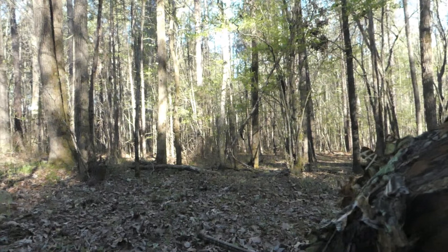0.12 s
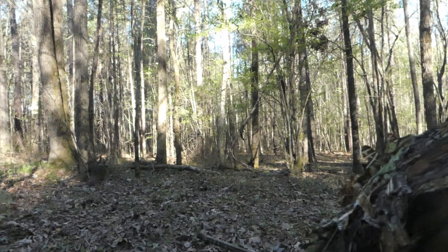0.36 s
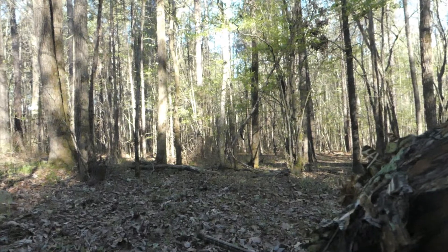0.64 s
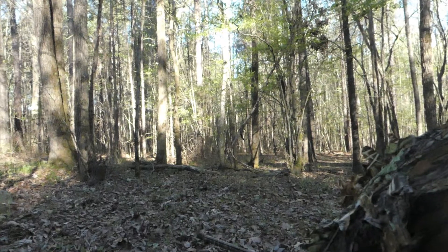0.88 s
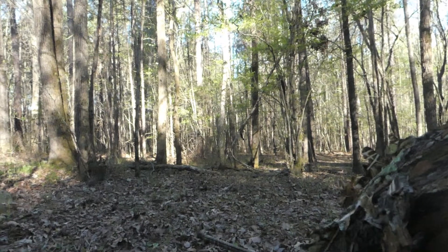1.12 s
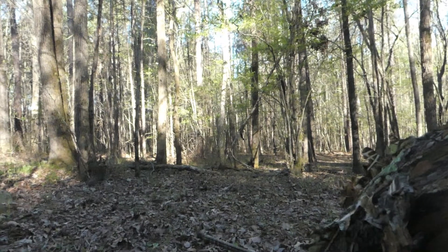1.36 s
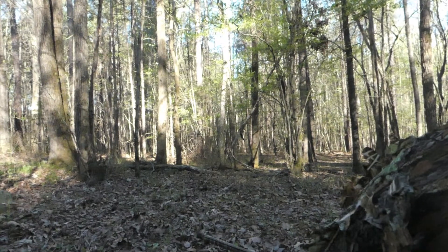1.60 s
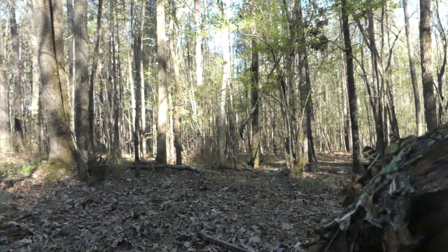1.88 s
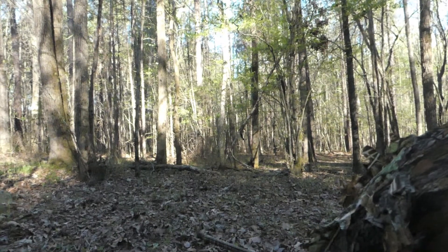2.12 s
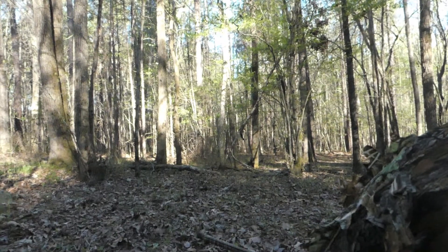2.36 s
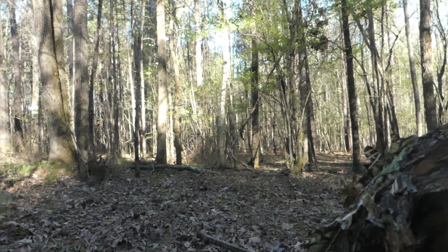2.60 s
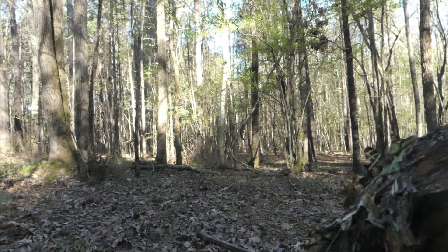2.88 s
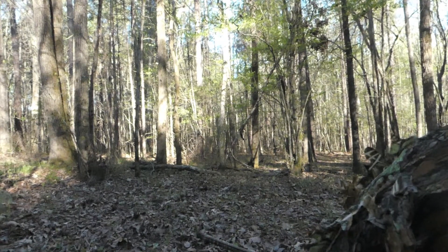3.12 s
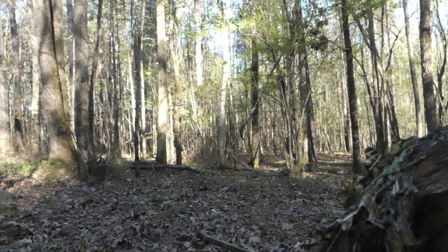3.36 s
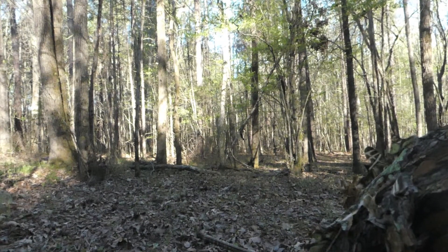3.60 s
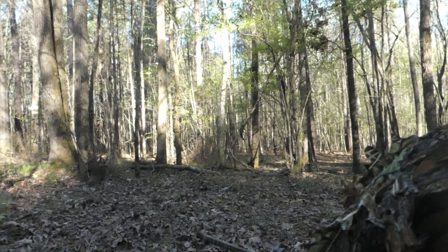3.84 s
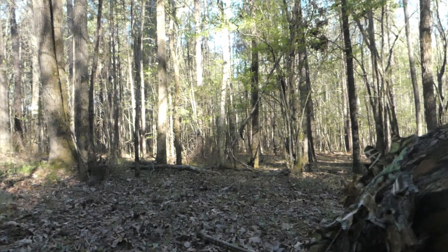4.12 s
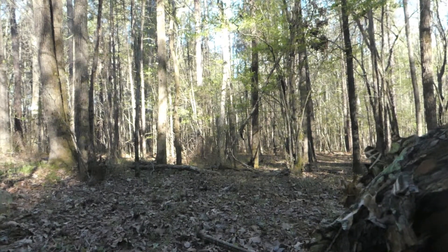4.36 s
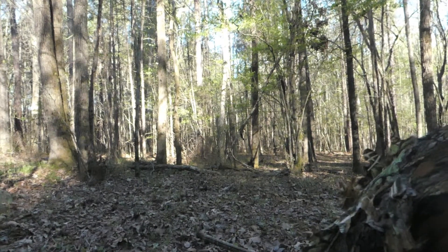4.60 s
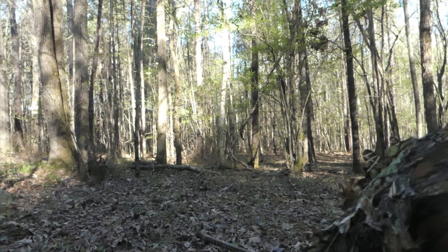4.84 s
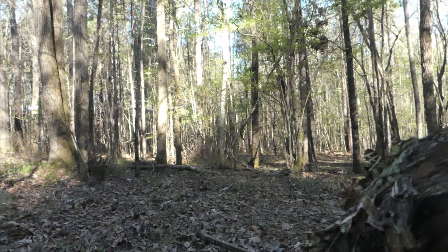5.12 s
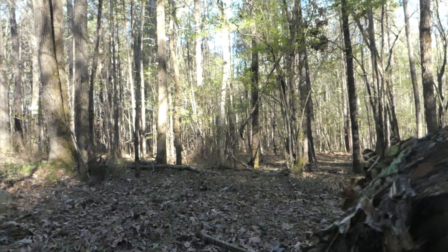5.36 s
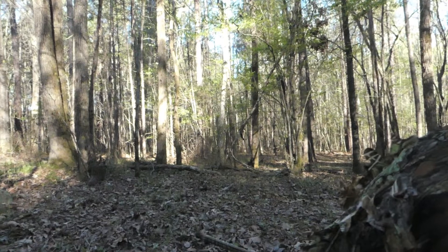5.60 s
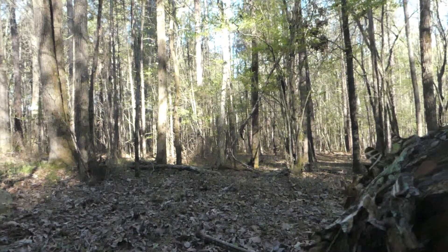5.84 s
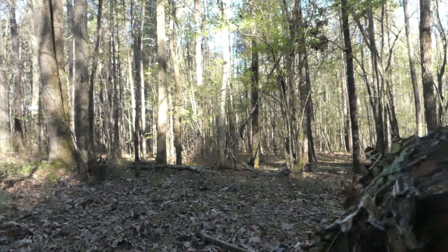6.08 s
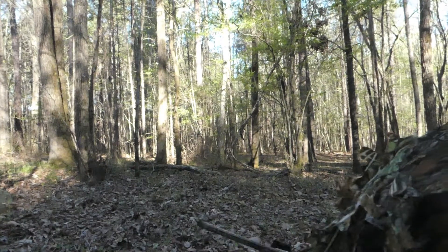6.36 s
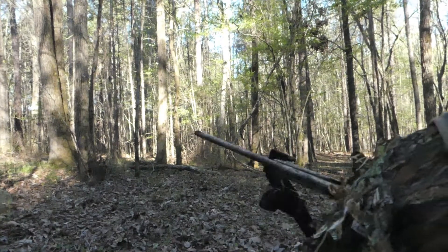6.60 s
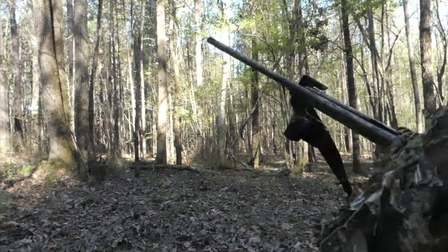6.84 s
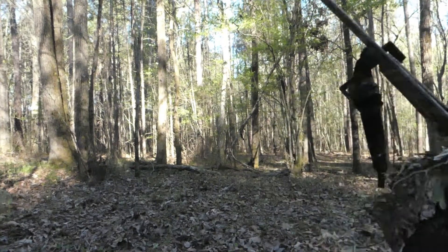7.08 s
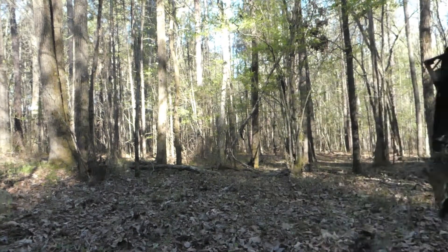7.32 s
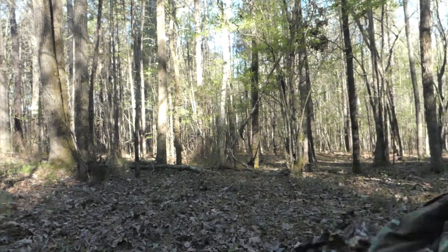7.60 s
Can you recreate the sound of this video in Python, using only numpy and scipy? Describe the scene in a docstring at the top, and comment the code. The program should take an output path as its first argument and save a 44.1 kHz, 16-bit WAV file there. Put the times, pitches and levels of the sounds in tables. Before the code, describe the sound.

Outdoor forest ambience, very quiet at first: low traffic-like hush, thin high bird chirps with woodland echo, tiny crisp ticks close by. After a faint fabric brush and a repeated bird phrase, rustling begins softly, then swells quickly into loud, bright, crackling cloth friction right at the microphone, with sharp snaps and a few padded thumps, easing but still rustling at the end. Narrow stereo image.

```python
"""A quiet wood: a far traffic-like hum and hiss lasts throughout, with dry ticks of leaves and stiff cloth.
A far whistler slides upward first; then come short chirps, a near bird's call and a phrase sung three times.
Cloth brushes lightly; then someone rises, and cloth drags and crackles loudly with a few dull knocks.
Hum, hiss and cloth are shaped noise, birds are gliding sines, and ticks and knocks are brief dying rings."""
import sys
import numpy as np
from scipy import signal
from scipy.fft import rfft, irfft, next_fast_len
from scipy.io import wavfile
from scipy.ndimage import uniform_filter1d

SR = 44100
rng = np.random.default_rng(int(sys.argv[2]) if len(sys.argv) > 2 else 0)


def bounce(signal):
    """Save signal as a 16-bit WAV file at the path given by the first command-line argument."""
    frames = np.transpose(np.atleast_2d(signal))
    limited = np.clip(frames, -1, 1)
    pcm = np.round(limited * 32767).astype(np.int16)
    wavfile.write(sys.argv[1], SR, pcm)


def voltage_ratio(decibels):
    """Convert decibels (scalar or array-like) to amplitude ratios, 20 dB per decade."""
    exponent = np.asarray(decibels, float) / 20
    return 10 ** exponent


N = 339994   # length of the scene [samples]


def rms_one(x):
    """Scale a sound so that its rms (average strength) is 1."""
    return x / np.sqrt(np.mean(x ** 2) + 1e-20)


def at_hz(points, hz):
    """Read a table of (frequency [Hz], level [dB]) along a logarithmic frequency axis."""
    table_hz, table_db = np.transpose(points)
    return np.interp(np.log(hz), np.log(table_hz), table_db)


def coloured(x, points):
    """Make each frequency louder or softer, as a table of (frequency [Hz], level [dB]) says."""
    size = next_fast_len(N)
    hz = np.maximum(np.arange(size // 2 + 1) * SR / size, 1)
    spectrum = rfft(x, size) * voltage_ratio(at_hz(points, hz))
    return irfft(spectrum, size)[..., :N]


def band(x, low_hz, high_hz):
    """Keep mainly the frequencies between two limits."""
    limits = [low_hz, min(high_hz, 0.45 * SR)]
    return signal.sosfilt(signal.butter(2, limits, "band", fs=SR, output="sos"), x)


def drift(rate_hz):
    """Smooth random wandering with rms 1: white noise through a low-pass filter."""
    r = np.exp(-2 * np.pi * rate_hz / SR)
    noise = rng.standard_normal(N + SR)
    # the first second lets the filter settle and is thrown away
    return rms_one(signal.lfilter([1], [1, -2 * r, r * r], noise)[SR:])


def add(out, s, sound):
    """Mix a short sound in at a time in seconds."""
    i = round(s * SR)
    out[i:i + len(sound)] += sound[:N - i]


def slips(per_s, spread_db):
    """Random clicks, many small and a few large, as when surfaces stick and let go."""
    sizes = voltage_ratio(spread_db * np.minimum(rng.exponential(1, N), 5))
    signs = rng.choice([-1, 1], N)
    happens = rng.random(N) < per_s / SR
    return rms_one(sizes * signs * happens)


# Colour of the still air: (frequency [Hz], relative level [dB])
AIR_COLOUR = [(15, -27), (25, -1), (55, -9), (123, -8), (179, -12.5), (283, -14.5), (361, -16.5),
              (391, -15), (527, -12), (587, -12), (728, -12.5), (1820, -26), (3390, -29.5), (3670, -29),
              (15800, -38)]
# Slow rise and fall of the air around its base level: (time [s], level [dB])
AIR_SWELL_PATH = [(0, 1.5), (1.5, 0.5), (3, 0.5), (4, 0), (5, 1), (6, 0), (7.71, 3)]


def air():
    """Far hum and hiss: coloured noise whose level breathes a little."""
    base_db, breath_db = -47, 0.78
    swell_db = np.interp(np.arange(N) / SR, *np.transpose(AIR_SWELL_PATH))
    hiss = rms_one(coloured(rng.standard_normal(N), AIR_COLOUR))
    return voltage_ratio(base_db + swell_db + breath_db * drift(3.5)) * hiss


# Echoes among the trunks, by pitch: (centre frequency [Hz], time to fall 60 dB [s], level [dB])
TRUNK_ECHOES = [(1800, 1.3, -0.5), (3000, 1.24, -0.8), (4560, 1, 0), (7050, 0.38, 4)]


def trunks(x):
    """Countless weak echoes off trunks: noise that builds fast and dies away, the treble first."""
    t = np.arange(SR) / SR
    build_up = 1 - np.exp(-t / 0.022)
    echoes = 0
    for hz, t60, db in TRUNK_ECHOES:
        noise = band(rng.standard_normal(SR), hz / 1.28, hz * 1.28)
        tail = noise * voltage_ratio(-60 * t / t60) * build_up
        echoes = echoes + voltage_ratio(db) * tail / np.sqrt(np.sum(tail ** 2) * SR / hz)
    return signal.fftconvolve(x, echoes)[:N]


def whistles(notes):
    """Near-sine whistles, each a straight glide in pitch that swells and fades."""
    out = np.zeros(N)
    for s, length, first_hz, last_hz, db in notes:
        u = np.linspace(0, 1, int(length * SR))   # runs from 0 to 1 through the note
        shape = np.sin(np.pi * u ** 1.1) ** 0.55
        hz = first_hz + (last_hz - first_hz) * u
        tone = np.sin(2 * np.pi * np.cumsum(hz) / SR)
        add(out, s, np.sqrt(2) * voltage_ratio(db) * shape * tone)
    return out


# A near bird's call jumps up, breaks down and sags: (time [s], pitch [Hz], rms level [dB])
CALL_PATH = [(2.636, 4810, -62), (2.652, 5280, -52), (2.674, 5220, -45), (2.682, 4640, -56),
             (2.72, 4560, -59), (2.79, 4350, -66), (2.86, 4350, -65), (2.92, 4380, -65)]


def near_call():
    """One unbroken sine whistle that follows a path of pitch and level."""
    s, hz, db = np.transpose(CALL_PATH)
    t = np.arange(s[0], s[-1], 1 / SR)
    tone = np.sin(2 * np.pi * np.cumsum(np.interp(t, s, hz)) / SR)
    out = np.zeros(N)
    add(out, s[0], np.sqrt(2) * voltage_ratio(np.interp(t, s, db)) * tone)
    return out


# Upward slides of a far whistler: (time [s], length [s], first pitch [Hz], level [dB])
FAR_SLIDES = [(0.188, 0.055, 1840, -60.5), (0.542, 0.14, 1696, -56), (0.969, 0.11, 1800, -54)]
# Single chirps: (time [s], length [s], first pitch [Hz], last pitch [Hz], level [dB])
SINGLE_CHIRPS = [(1.322, .03, 4730, 4600, -63), (1.372, 0.024, 3720, 3870, -56.5),
                 (2.056, .03, 3000, 3600, -58.5), (2.322, .034, 6300, 5500, -53),
                 (3.025, .06, 7550, 7250, -65), (3.16, .05, 3620, 3570, -67), (3.27, .07, 2740, 3300, -65),
                 (3.38, .14, 2520, 2465, -65), (3.345, 0.045, 4450, 5500, -59),
                 (3.522, .016, 4870, 5100, -54), (3.54, .014, 5350, 5800, -57),
                 (3.632, 0.14, 4080, 3720, -61), (3.83, 0.068, 3850, 3700, -59),
                 (4.13, 0.049, 6250, 6100, -60), (4.192, .08, 5800, 5230, -65),
                 (4.425, .035, 4400, 4900, -56), (4.52, .065, 4750, 5700, -59),
                 (4.988, 0.032, 4450, 4940, -53), (5.017, 0.035, 4850, 3930, -54),
                 (5.118, 0.03, 2170, 2250, -58), (5.216, 0.035, 3200, 3640, -59)]
# A singer's phrase: (time after its start [s], length [s], first pitch [Hz], last pitch [Hz],
# level within the phrase [dB])
SUNG_PHRASE = [(0, 0.0324, 3750, 3210, -2), (0.037, 0.032, 3340, 3520, -11),
               (0.039, 0.0268, 2750, 3210, 0.5), (0.087, 0.07, 3820, 5140, -2.5),
               (0.178, 0.0872, 2300, 2103, -1.5), (0.258, 0.047, 2235, 2760, 0.5)]
# Each singing of the phrase: (time [s], level of high notes [dB], level of low notes [dB])
PHRASE_REPEATS = [(4.333, -64, -56), (4.733, -53, -53.5), (5.139, -52.5, -57)]


def birds():
    """Every bird, fluttering, with its echoes; the farther ones echo more strongly."""
    slide_hz_per_s, low_note_hz = 7000, 2500   # notes that start below low_note_hz count as low
    slide_echo_db, phrase_echo_db, chirp_echo_db = 7.5, 6.5, -6.5
    slide_notes = [(s, length, hz, hz + slide_hz_per_s * length, db) for s, length, hz, db in FAR_SLIDES]
    phrase_notes = []
    for s, high_db, low_db in PHRASE_REPEATS:
        for after, length, first_hz, last_hz, db in SUNG_PHRASE:
            singing_db = low_db if first_hz < low_note_hz else high_db
            phrase_notes.append((s + after, length, first_hz, last_hz, db + singing_db))
    slides = whistles(slide_notes)
    phrases = whistles(phrase_notes)
    chirps = whistles(SINGLE_CHIRPS) + near_call()
    flutter = voltage_ratio(3.5 * drift(90))   # leaves in the path make the direct sound flutter
    to_echo = voltage_ratio(slide_echo_db) * slides + voltage_ratio(phrase_echo_db) * phrases + voltage_ratio(chirp_echo_db) * chirps
    return flutter * (slides + phrases + chirps) + trunks(to_echo)


def settling(db):
    """Faint crackle of leaves and cloth settling: random clicks ringing near the port's resonance."""
    crackle = slips(per_s=250, spread_db=3) * voltage_ratio(3.5 * drift(2.5))
    return voltage_ratio(db) * rms_one(band(crackle, 4660, 6080))


# Ticks and snaps: (time [s], peak level of the ring [dB], ring pitch [Hz],
# peak of the crisp puff above that of the ring [dB])
TICK_EVENTS = [(0.227, -41.5, 4770, -6), (0.3501, -30, 4600, -18), (0.411, -42, 4570, -10),
               (0.518, -35, 4900, -9), (0.6038, -42, 2820, -1), (0.9353, -42, 4400, 5),
               (1.184, -40, 4550, -12), (1.296, -44.5, 6290, -6), (1.3244, -52, 4660, -9),
               (1.9705, -39, 4100, -11), (2.0744, -48, 3480, -6), (2.0894, -42, 5130, -9),
               (2.173, -43.5, 2740, -12), (2.9128, -42, 4400, -1), (3.0022, -34.5, 5240, -2),
               (3.2812, -45, 4660, 11), (3.469, -41, 5970, 6.5), (4.0826, -36.5, 5060, -3),
               (4.2178, -47, 5360, -1), (4.3257, -43, 2500, -1), (4.6049, -36, 3850, 1),
               (4.619, -32, 4940, -6), (4.6724, -36.5, 4900, -13), (4.7132, -37, 5040, 0),
               (4.7316, -38, 3900, -6), (5.0544, -38.5, 2480, -3), (5.214, -36, 5300, -8),
               (5.45, -47, 5130, 15), (5.649, -35, 5970, -6), (6.0088, -33.5, 5300, 2),
               (6.3036, -43, 4790, -8), (6.573, -28, 3930, -3), (6.668, -26, 5330, -16),
               (6.7192, -33, 1470, 2), (6.776, -30.5, 5230, -9), (6.788, -26.5, 4100, 1),
               (6.81, -30, 4000, -11), (6.8255, -22, 5300, 1.5), (6.8394, -25, 5730, -2),
               (6.9597, -11.5, 5040, -8.5), (6.9835, -24, 4620, -2), (7.0085, -19, 4940, -6),
               (7.0517, -23, 5040, -1), (7.1184, -19, 5040, -8), (7.1575, -14, 5390, -4),
               (7.165, -15, 5660, 12), (7.1926, -8.5, 3160, -4), (7.1984, -12, 3000, -1),
               (7.2106, -16, 3500, 6), (7.2267, -18, 5070, -6), (7.232, -9.5, 5670, 8),
               (7.2613, -23, 5740, -5), (7.3247, -11, 3000, -15), (7.4217, -13, 5250, -14),
               (7.4264, -12, 5700, 7), (7.4386, -20.5, 4860, 10), (7.461, -17, 5190, 11),
               (7.47, -22, 3420, -10), (7.687, -18, 5590, -8)]


def ticks():
    """Each snap is a very brief ring at its own pitch plus a shorter, broad, crisp puff of noise."""
    out, t = np.zeros(N), np.arange(600) / SR
    for s, db, hz, crisp_db in TICK_EVENTS:
        bursts = rng.standard_normal((2, 600))
        ring = band(bursts[0] * t * np.exp(-t / 0.00063), hz / 1.11, hz * 1.15)
        crisp = band(bursts[1] * t * np.exp(-t / 0.0003), 1700, 11000)
        snap = ring / abs(ring).max() + voltage_ratio(crisp_db) * crisp / abs(crisp).max()
        add(out, s, voltage_ratio(db) * snap)
    return out


# Dull knocks: (time [s], level before rounding and decay [dB], ring pitch [Hz], time to fall 60 dB [s])
KNOCK_EVENTS = [(6.652, -36, 468, 0.041), (6.938, -24, 750, 0.029), (7.066, -10.5, 490, 0.028),
                (7.085, -28, 87, 0.23), (7.5, -25, 343, 0.056), (7.538, -30, 125, 0.085),
                (7.557, -28.5, 252, 0.096)]


def knocks():
    """Soft blows on a padded body: a sine that dies away after a rounded start."""
    out, t = np.zeros(N), np.arange(SR // 3) / SR
    for s, db, hz, t60 in KNOCK_EVENTS:
        decay = voltage_ratio(db - 60 * t / t60)
        rounded_start = 1 - np.exp(-t * hz * 3.2)
        add(out, s, decay * rounded_start * np.sin(2 * np.pi * hz * t))
    return out


def fibres(clump_db, crackle_db, hiss_db):
    """Fibres slip in clumps, each slip ringing briefly in many pitch bands, over smooth friction."""
    edges = 100 * 2 ** np.arange(0, 7.6, 0.5)   # half-octave bands [Hz]
    shared = drift(60)
    crackle = slips(per_s=500, spread_db=1.0)   # stiff creases pop over the whole range at once
    out = 0
    for low_hz, high_hz in zip(edges, edges[1:]):
        drive = slips(per_s=2500, spread_db=2.0)
        drive = drive + voltage_ratio(crackle_db) * crackle + voltage_ratio(hiss_db) * rng.standard_normal(N)
        clumps = voltage_ratio(clump_db * (0.8 * shared + 0.7 * drift(90)))
        out = out + band(drive * clumps, low_hz, high_hz)
    return out


# How hard the cloth moves, one list for a light brush and one for the rising:
# (time [s], level of the main rustle [dB])
MOVEMENT = [
    [(4.4, -72), (4.43, -82), (4.47, -59.5), (4.6, -55), (4.72, -61.5), (4.77, -67), (4.8, -72)],
    [(6.05, -75), (6.104, -71), (6.18, -56.5), (6.244, -50.5), (6.314, -56.5), (6.5, -50.5), (6.676, -49.5),
     (6.756, -50.5), (6.836, -43.5), (6.856, -44), (6.944, -35.5), (7.05, -29.5), (7.126, -23.5),
     (7.326, -22.5), (7.345, -30), (7.405, -32.5), (7.425, -24.5), (7.465, -26), (7.505, -31), (7.535, -31),
     (7.57, -35), (7.632, -29), (7.71, -34)],
]
# Colour of the cloth: (frequency [Hz], relative level [dB])
CLOTH_COLOUR = [(59, -35), (100, -2), (143, -8), (396, -0.5), (469, 0.5), (631, -1.5), (1240, -2.5),
                (2900, -3), (4150, -2.5), (5580, -3), (9480, -12.5), (11700, -14.5), (13900, -19.5),
                (15800, -37)]
# Dull rub, scrape and crisp top, one row each:
# (level above the main rustle at the loud level [dB], dB lost per dB of harder movement)
BALANCE = [(-9.5, 0.4041), (-5.5, 0.1727), (-7.5, 0.0412)]


def cloth(clump_db, crackle_db, hiss_db):
    """Dragging cloth: slipping fibres, louder and brighter the harder it moves."""
    port_hz, port_width_hz, port_db = 5300, 1400, -6   # ring of the microphone port
    loud_db = -25   # movement level at which the balance table holds
    brush_ends_s, brush_rub_db = 5, -12   # the light brush has less dull rub
    friction = fibres(clump_db, crackle_db, hiss_db)
    port = signal.lfilter(*signal.iirpeak(port_hz, port_hz / port_width_hz, SR), friction)
    rustle = coloured(friction + voltage_ratio(port_db) * port, CLOTH_COLOUR)

    # four shares of the spectrum that add up to one; each part is then levelled on its own
    size = next_fast_len(N)
    hz = np.arange(size // 2 + 1) * SR / size
    below_1500, below_3800, below_7500 = [1 / (1 + (hz / f) ** 6) for f in (1500, 3800, 7500)]
    shares = [below_7500 - below_3800, below_1500, below_3800 - below_1500, 1 - below_7500]
    spectrum = rfft(rustle, size)
    main, rub, scrape, crisp = [rms_one(irfft(spectrum * share, size)[:N]) for share in shares]

    t = np.arange(N) / SR
    level_db = np.interp(t, *np.transpose(np.concatenate(MOVEMENT)))
    rub = rub * np.where(t < brush_ends_s, voltage_ratio(brush_rub_db), 1)
    mix = main
    for (db, loss), part in zip(BALANCE, (rub, scrape, crisp)):
        mix = mix + voltage_ratio(db - loss * (level_db - loud_db)) * part
    moving = sum((t >= rows[0][0]) & (t < rows[-1][0]) for rows in MOVEMENT) > 0
    gate = uniform_filter1d(moving * 1.0, size=400)   # short fades at the ends of each movement
    return gate * voltage_ratio(level_db) * mix


# Left-right difference of birds and near sounds: (frequency [Hz], gain [dB])
SOURCE_SIDE = [(60, -31), (150, -24), (380, -29), (950, -25), (2380, -24.5), (5980, -23.5), (15000, -18)]
# Colour of the faint hiss that differs left to right: (frequency [Hz], relative level [dB])
SIDE_HISS = [(15, -33), (25, -2), (234, -0.5), (380, 0.5), (602, -1), (901, -4.5), (2440, -5.5), (6990, -6),
             (14100, -9), (15700, -13)]


def stereo_difference(sources):
    """A slight stereo width: a little of the sound differs left to right, plus faint hiss, both flickering."""
    follows = coloured(sources * drift(33), SOURCE_SIDE)
    hiss = voltage_ratio(-69) * rms_one(coloured(rng.standard_normal(N), SIDE_HISS))
    return (follows + hiss) * voltage_ratio(4.4 * drift(34))


def scene():
    """Far air, echoing birds and dry near sounds, with a slight stereo width."""
    near = settling(db=-68) + ticks() + knocks() + cloth(clump_db=1.5, crackle_db=-0.5, hiss_db=-1.5)
    sources = birds() + near
    side = stereo_difference(sources)
    return air() + sources + side * [[1], [-1]]   # left gets plus, right gets minus


def band_limit(x):
    """A steep low-pass at the top of the band."""
    return signal.sosfilt(signal.butter(12, 16430, fs=SR, output="sos"), x)


# Pass band of the microphone: (frequency [Hz], gain [dB])
PASS_BAND = [(15, -25), (45, 0), (15780, 0), (15800, -90)]


def record(dry):
    """The microphone: a narrow dip in its response, and cut ends of the spectrum."""
    dip_hz, dip_width_hz = 5900, 115
    dipped = signal.lfilter(*signal.iirnotch(dip_hz, dip_hz / dip_width_hz, SR), dry)
    # some undipped sound keeps the dip from being total; the two shares also set the final level
    mix = coloured(0.19 * dry + 0.68 * dipped, PASS_BAND)
    return band_limit(mix)


dry = scene()
out = record(dry)
bounce(out)
```